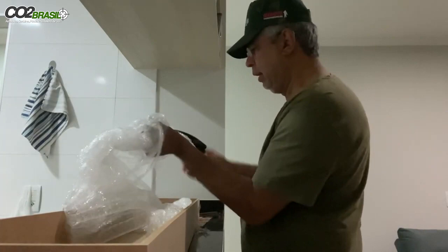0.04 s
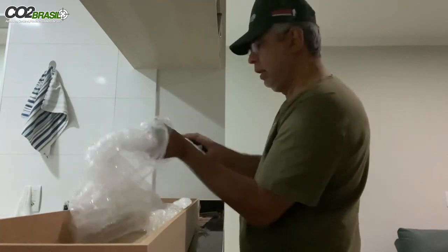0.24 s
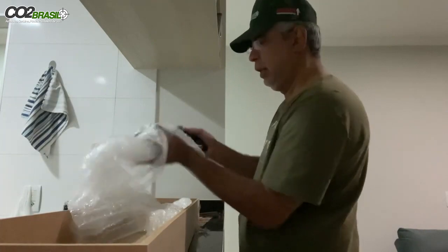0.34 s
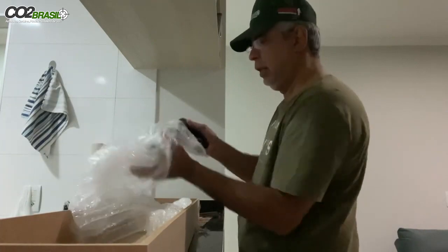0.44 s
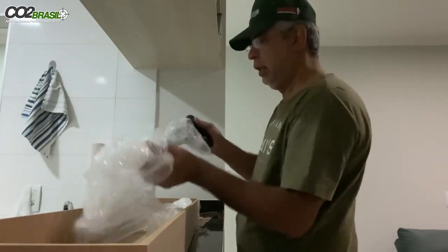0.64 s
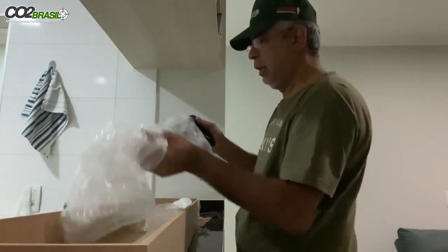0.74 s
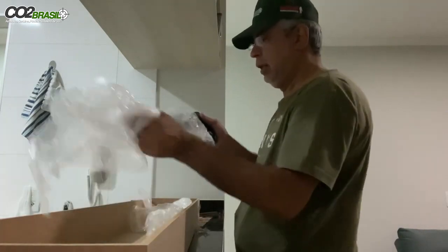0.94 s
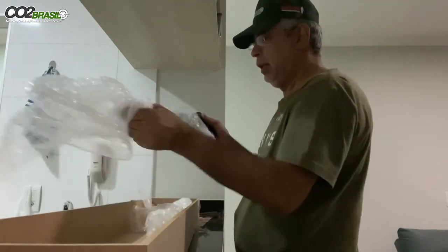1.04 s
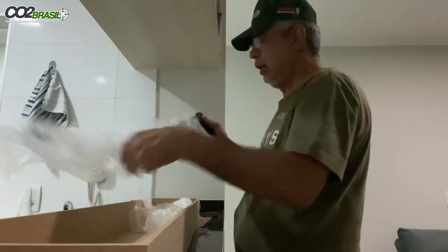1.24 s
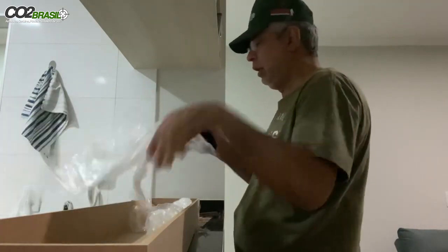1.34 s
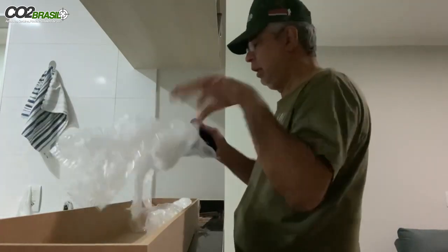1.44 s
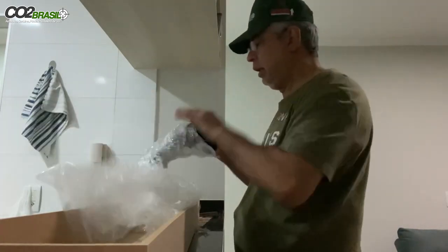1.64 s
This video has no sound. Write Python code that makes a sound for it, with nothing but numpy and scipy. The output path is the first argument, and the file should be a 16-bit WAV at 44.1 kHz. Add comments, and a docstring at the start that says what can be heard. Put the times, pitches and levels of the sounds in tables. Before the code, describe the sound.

Crinkling bubble wrap, faint at first, bursts into sharp crackles in a hard-walled kitchen, then dies away

```python
"""A hand pulls a sheet of plastic bubble wrap off an object in a hard-walled kitchen and tosses it aside.
A low wavering hum (a frequency-modulated sine) and room noise (shaped noise bands) sound throughout.
The film is faint at first, then crackles loudly as its folds buckle (struck resonators) and dies away.
Larger creases snap (decaying noise bursts); stiff parts knock softly among the snaps and mostly near
the end (decaying sines). Walls echo the film (feedback delays); a small microphone adds fixed resonances."""
import sys
import numpy as np
from scipy import signal
from scipy.fft import rfft, irfft, next_fast_len
from scipy.io import wavfile

SR = 44100
rng = np.random.default_rng(int(sys.argv[2]) if len(sys.argv) > 2 else 0)


def to_wav(s):
    """Save 16-bit WAV."""
    ch = np.atleast_2d(s).T  # columns
    pcm = np.round(np.clip(ch, -1, 1) * 32767)  # PCM
    wavfile.write(sys.argv[1], SR, pcm.astype(np.int16))


def gain_from_decibels(decibels):
    """Convert decibel values to linear amplitude factors."""
    exponent = np.asarray(decibels, float) / 20
    return 10 ** exponent


N = 74970


def rms_one(x):
    """Normalization: scale a signal to unit root-mean-square."""
    return x / np.sqrt(np.mean(x ** 2) + 1e-20)


def in_time(rows):
    """Linear interpolation: read each column of a time curve at every sample."""
    times, *columns = np.transpose(rows)
    return [np.interp(np.arange(N) / SR, times, column) for column in columns]


def at_hz(points, hz):
    """Interpolation of a spectrum in dB along a logarithmic frequency axis."""
    point_hz, point_db = np.array(points)[:, 0], np.array(points)[:, 1]
    return np.interp(np.log(hz), np.log(point_hz), point_db)


def drift(rate_hz):
    """Slow random variation of unit rms: white noise through two equal low-pass poles at rate_hz."""
    step = 20  # samples between computed values
    pole = np.exp(-2 * np.pi * rate_hz * step / SR)
    white = rng.standard_normal(N // step + 2002)
    slow = signal.lfilter([1], [1, -2 * pole, pole * pole], white)[2000:]  # drop the filter's start
    return np.interp(np.arange(N) / step, np.arange(len(slow)), rms_one(slow))


def band(x, low_hz, high_hz):
    """Butterworth band-pass: keep the frequencies between two edges."""
    sections = signal.butter(2, [low_hz, high_hz], "band", fs=SR, output="sos")
    return signal.sosfilt(sections, x)


def hum():
    """Frequency modulation: the phase of a sine is the running sum of its wavering frequency."""
    # wavering strength of the hum: (time [s], rms level [dB])
    hum_curve = [(0.0, -38.5), (0.25, -32.5), (0.624, -42), (0.69, -35), (0.742, -45), (0.77, -34.5),
                 (1.054, -42), (1.074, -68), (1.144, -41), (1.23, -64), (1.316, -38), (1.34, -58),
                 (1.458, -39), (1.566, -50), (1.624, -51), (1.7, -43.5)]
    centre_hz, wander, wander_rate_hz = 57.7, 0.087, 6.1  # wander: rms fraction of centre_hz
    level_db, = in_time(hum_curve)
    hz = centre_hz * (1 + wander * drift(wander_rate_hz))
    phase = 2 * np.pi * np.cumsum(hz) / SR
    return gain_from_decibels(level_db) * np.sqrt(2) * np.sin(phase + rng.uniform(0, 2 * np.pi))


def air():
    """Noise synthesis by bands: half-octaves of white noise weighted to the spectrum of the room."""
    # spectrum of the room noise: (frequency [Hz], relative density [dB per Hz])
    air_spectrum = [(65, 0), (120, -4.5), (200, -14), (350, -11), (700, -24), (1500, -27.5), (3500, -35.5),
                    (8000, -34.5), (15500, -49)]
    total_db, patch_db, patch_rate_hz = -41.5, -0.5, 1.8  # each band's level drifts on its own
    white = rng.standard_normal((2, N + SR // 4))
    edges_hz = 65 * 2 ** np.arange(0, 8.1, .5)
    out = 0
    for k, (low, high) in enumerate(zip(edges_hz, edges_hz[1:])):
        band_db = at_hz(air_spectrum, np.sqrt(low * high)) + patch_db * drift(patch_rate_hz)
        # neighbouring bands use independent noises
        out = out + band(white[k % 2], low, high)[-N:] * gain_from_decibels(band_db)
    return gain_from_decibels(total_db) * rms_one(out)


def folds():
    """Impulse excitation: random clicks of tiny buckling folds strike damped resonators of fixed pitch."""
    # how hard the film is worked: (time [s], relative level [dB], dullness [dB per octave])
    pull = [(0, -44, -3), (.09, -60, -3), (.18, -55, 7.5), (.25, -33, -1.5), (.318, -27.5, -4.5),
            (.33, -22, -2.5), (.39, -21, 1.7), (.425, -24, -1.5), (.47, -19, 3), (.53, -19.5, 0.5),
            (.6, -17.5, 1.6), (.655, -22.5, 2.5), (.705, -16.5, 1.2), (.76, -20.5, 3.5), (.82, -25, 1),
            (.865, -21, 0), (.885, -20.5, 1.6), (.97, -18, 1.2), (1.01, -21, -0.3), (1.06, -21, -0.9),
            (1.11, -22, -1.5), (1.18, -25.5, -1), (1.21, -24, 3), (1.27, -33, -2.7), (1.31, -24, -0.2),
            (1.41, -25.5, 1.7), (1.46, -37, -2.5), (1.53, -40.5, 2), (1.6, -44.5, 4), (1.655, -50, 9),
            (1.67, -43, -1), (1.7, -48.5, -10)]
    # spectrum of the film: (frequency [Hz], relative level [dB])
    film_spectrum = [(300, -11.5), (500, -10), (1000, -1), (2000, -7), (3500, 0.5), (5500, -6),
                     (10000, -18), (13000, -14.5), (15800, -21.5)]
    folds_per_s, spread_db, ring_cycles = 8000, 1.5, 2.74  # ring_cycles: cycles to fall 60 dB
    clump_db, clump_rate_hz = 1.5, 39.5  # fast wavering of the whole
    patch_db, patch_rate_hz = 2, 4.4  # each pitch swells and fades on its own
    film_db = -2.5
    level_db, dull_db = in_time(pull)

    strength_db = spread_db * np.minimum(rng.exponential(1, N), 4.0)
    clicks = gain_from_decibels(strength_db) * rng.choice([-1, 1], N) * (rng.random(N) < folds_per_s / SR)
    pitches_hz = np.geomspace(film_spectrum[0][0], film_spectrum[-1][0], num=24)
    pitch_index = (24 * rng.random(N) ** .5).astype(int)  # high pitches get more of the folds
    out = 0
    for k, hz in enumerate(pitches_hz):
        pole, angle = gain_from_decibels(-60 * hz / (ring_cycles * SR)), 2 * np.pi * hz / SR
        struck = clicks * (pitch_index == k) + 1e-18
        rings = signal.lfilter([1, -1], [1, -2 * pole * np.cos(angle), pole * pole], struck)
        tilt_db = -dull_db * np.log2(hz / 3000)
        pitch_db = at_hz(film_spectrum, hz) + tilt_db + patch_db * drift(patch_rate_hz)
        # sqrt(hz): the pitches are spaced by equal ratios
        out = out + rms_one(rings) * np.sqrt(hz) * gain_from_decibels(pitch_db)
    clumped = out * gain_from_decibels(clump_db * drift(clump_rate_hz))
    return gain_from_decibels(level_db) * rms_one(clumped) * gain_from_decibels(film_db)


def snaps():
    """Transient radiation: a crease breaks with a click and an exponentially decaying noise rattle."""
    # larger creases: (time [s], middle-band peak [dB], bass re middle [dB], treble re middle [dB],
    # decay time constant [s])
    creases = [(0.226, -47, -8, 1, 0.0016), (0.261, -25, -8, 7, 0.0022), (.2955, -38, -15, -7, 0.0024),
               (.304, -40, -12, 7, 0.0025), (.3217, -8, -9, -2, .0018), (.3415, -6, -8, -2, .0025),
               (.3693, -6.5, -9, -3, .003), (.429, -4.5, -11, 0, .002), (0.371, -16, -6, 15, 0.00077),
               (0.373, -9, -29, -13, 0.0022), (0.384, -29, 2, -2, 0.003), (0.5087, -10.5, -16, -20, 0.0026),
               (0.512, -6.5, -11.5, -23, 0.0073), (0.563, -22, 0.5, 1.5, 0.0084),
               (.6228, -9, -2, -15, .004), (.6948, -6.5, -8, -12, .008), (.629, -19, -2, -11, .004),
               (0.671, -20.5, 1, -17, 0.0035), (0.6737, -10, -20, -8, 0.0057),
               (0.831, -21.5, 4, -15, 0.0044), (0.874, -7.5, -16, -15, 0.0071),
               (0.883, -17.5, -0.5, -22, 0.0028), (1.0197, -12.5, -8, -8, 0.012),
               (1.045, -15, -4, -8, 0.0031), (1.053, -11, -14, -8, 0.0081),
               (1.125, -18.5, -2.5, -8, 0.0036), (1.157, -24, -16, -4, 0.0017),
               (1.192, -13.5, -18, -6, .003), (1.293, -27.5, -2, -10, 0.0049), (1.494, -33, 3, -4, 0.0034),
               (1.551, -29, -10, -12, 0.0057), (1.626, -43.5, -4, -8, 0.0047)]
    # edges of the bass, middle and treble bands: (frequency [Hz], ...)
    edges_hz = (350, 1100, 4300, 10500)
    click = 6  # first sample against the unit-rms rattle
    t = np.arange(2000) / SR
    out = np.zeros(N + 2000)
    noise = rng.standard_normal((len(creases), len(t)))
    for (time, peak_db, bass_db, treble_db, decay_s), rattle in zip(creases, noise):
        burst = np.where(t == 0, click, rattle) * np.exp(-t / max(decay_s, 5e-4))
        start = int(time * SR)
        for k, part_db in enumerate((bass_db, 0, treble_db)):
            part = band(burst + 1e-18, edges_hz[k], edges_hz[k + 1])
            out[start:start + len(t)] += part / np.abs(part).max() * gain_from_decibels(peak_db + part_db)
    return out[:N]


def knocks():
    """Free vibration: a stiff part of the sheet, once struck, rings at one pitch and decays exponentially."""
    # struck stiff parts: (time [s], peak level [dB], frequency [Hz], 60 dB decay time [s])
    stiff_parts = [(.623, -22.5, 409, 0.082), (.431, -21, 1114, 0.066), (1.4956, -28, 1430, 0.026),
                   (1.497, -29, 470, 0.036), (1.542, -25.5, 1420, 0.017), (1.549, -31, 1120, 0.023),
                   (1.5502, -32.5, 1720, 0.062), (1.559, -34, 417, 0.12), (1.626, -35, 2040, 0.015),
                   (1.667, -38, 6150, 0.017)]
    out = np.zeros(N)
    for time, peak_db, hz, t60 in stiff_parts:
        start = int(time * SR)
        t = np.arange(N - start) / SR
        out[start:] += gain_from_decibels(peak_db - 60 * t / t60) * np.sin(2 * np.pi * hz * t)
    return out


def kitchen(x):
    """Reverberation by recirculation: ten feedback delays lose energy, most in the treble, on every round."""
    t60_s, wall_cut_hz = 0.45, 9400  # decay time at low frequency; low-pass corner of each round
    size = next_fast_len(N + SR)
    z = np.exp(-2j * np.pi * np.arange(size // 2 + 1) / size)  # delay of one sample
    dull = np.exp(-2 * np.pi * wall_cut_hz / SR)
    wall = (1 - dull) / (1 - dull * z)
    lags = (rng.uniform(.009, .04, 10) * SR).astype(int)
    total = 0
    for k, lag in enumerate(lags):
        loop = gain_from_decibels(-60 * lag / SR / t60_s) * wall * z ** lag
        total = total + (-1) ** k * loop / (1 - loop)  # geometric series of all rounds
    return irfft(rfft(x, size) * total, size)[:N]


def scene():
    """Superposition: the film and its room echo add to the hum and room noise."""
    room_db = -18
    background = hum() + air()
    film = folds() + snaps() + knocks()
    return (film + gain_from_decibels(room_db) * kitchen(film) + background)[None]


def top_cut(x):
    """Nothing passes above the cut-off."""
    return signal.sosfilt(signal.butter(12, 16520, fs=SR, output="sos"), x)


def record(dry):
    """Linear filtering: the microphone's resonances boost narrow bands and its response falls at the top."""
    # microphone resonances: (frequency [Hz], width [Hz], boost [dB])
    resonances = [(1340, 95, 7.5), (2138, 203, 7.5), (3194, 365, 9.5), (7620, 170, 3.5), (10000, 280, 1.5)]
    rolloff_hz, stop_hz = 10420, 16600  # gentle roll-off; edge of the steep filter's stop band
    for hz, width_hz, boost_db in resonances:
        pole, angle = np.exp(-np.pi * width_hz / SR), 2 * np.pi * hz / SR
        unit_peak = (1 - pole * pole) / 2 * np.array([1, 0, -1])
        peak = signal.lfilter(unit_peak, [1, -2 * pole * np.cos(angle), pole * pole], dry)
        dry = dry + (gain_from_decibels(boost_db) - 1) * peak
    dry = signal.sosfilt(signal.butter(2, rolloff_hz, fs=SR, output="sos"), dry)
    dry = signal.sosfilt(signal.cheby2(12, 70, stop_hz, fs=SR, output="sos"), dry)
    return top_cut(dry)


dry = scene()
out = record(dry)
to_wav(out)
```